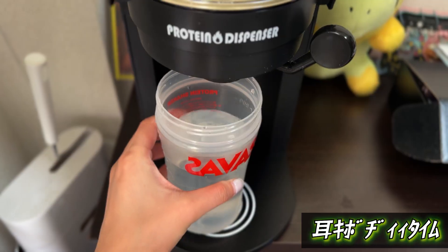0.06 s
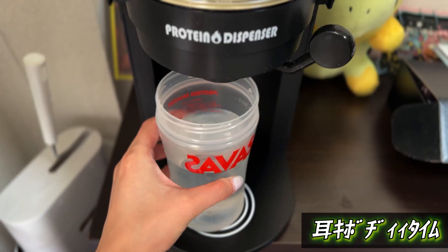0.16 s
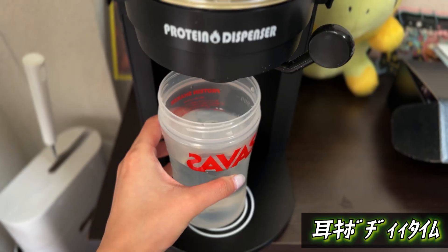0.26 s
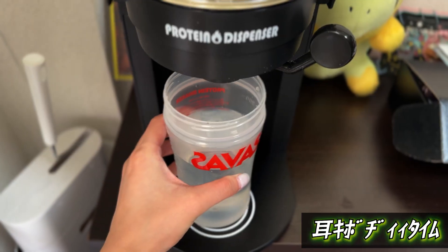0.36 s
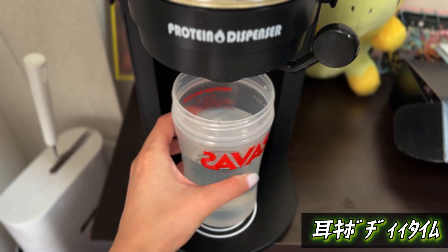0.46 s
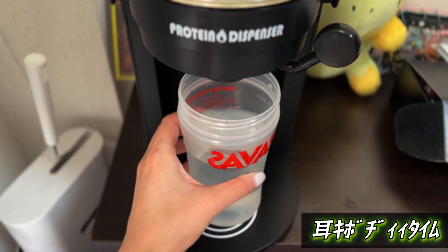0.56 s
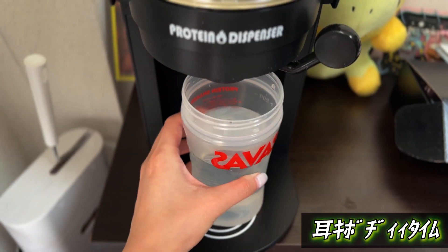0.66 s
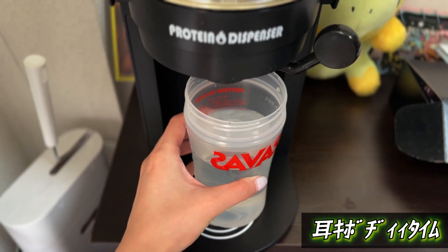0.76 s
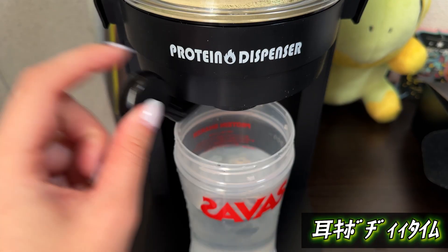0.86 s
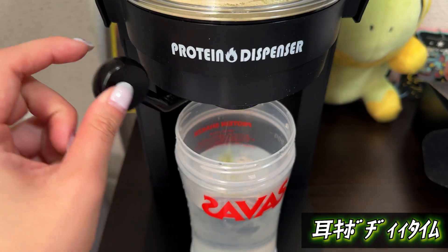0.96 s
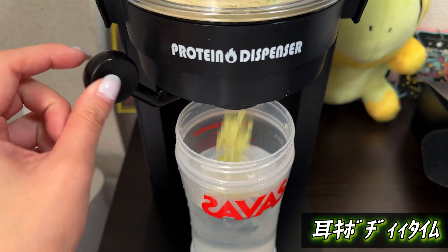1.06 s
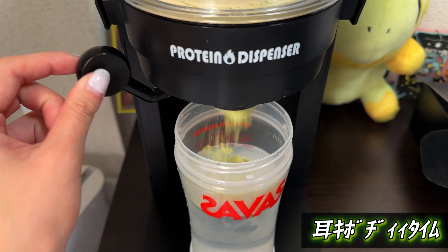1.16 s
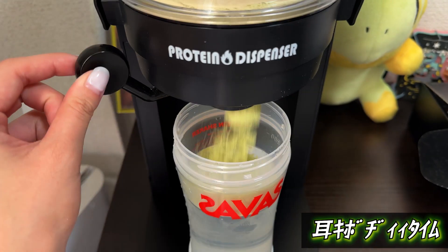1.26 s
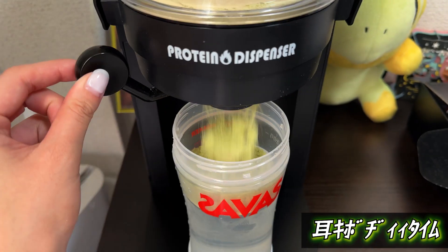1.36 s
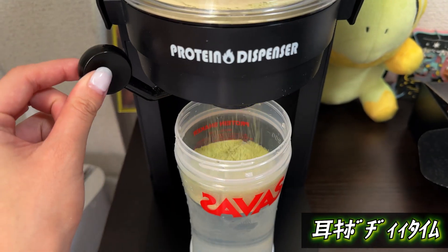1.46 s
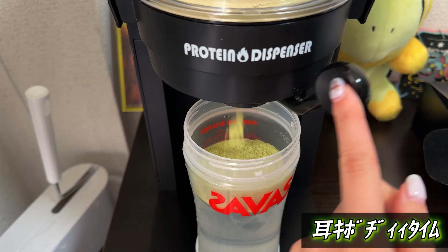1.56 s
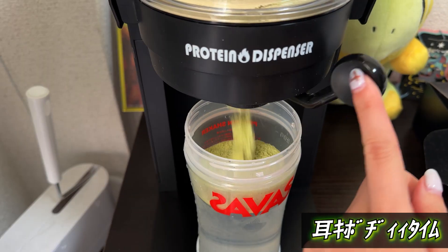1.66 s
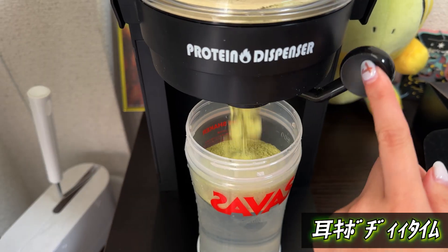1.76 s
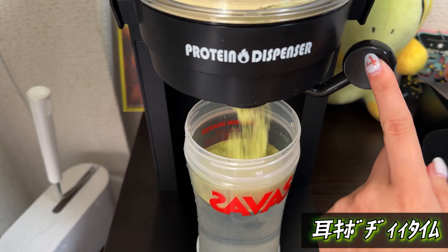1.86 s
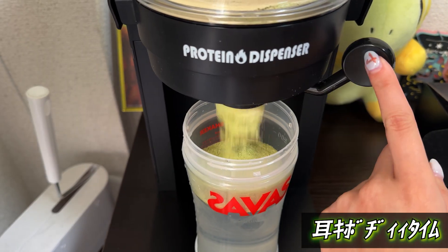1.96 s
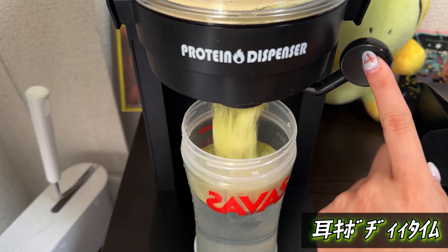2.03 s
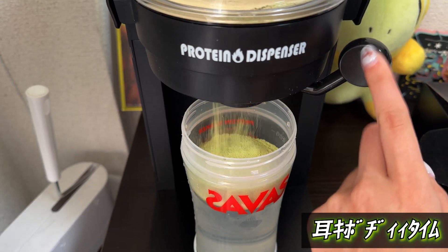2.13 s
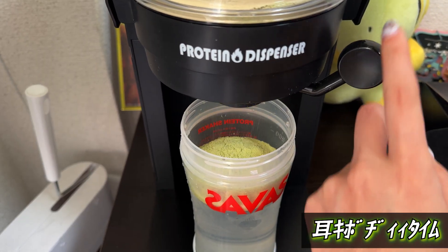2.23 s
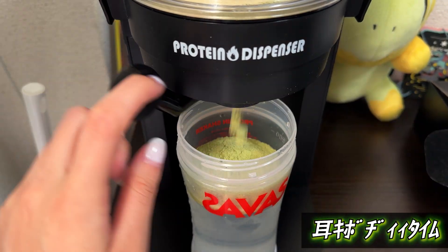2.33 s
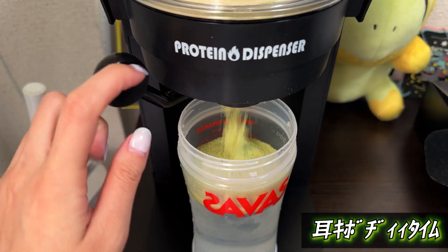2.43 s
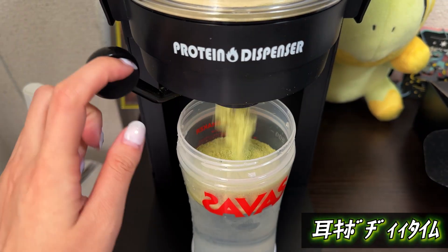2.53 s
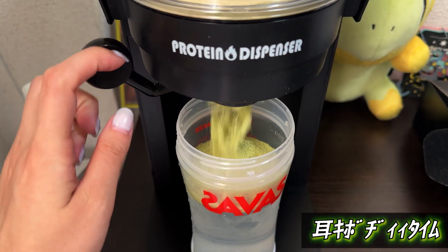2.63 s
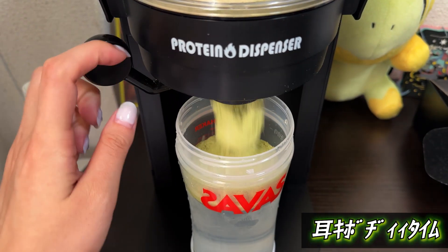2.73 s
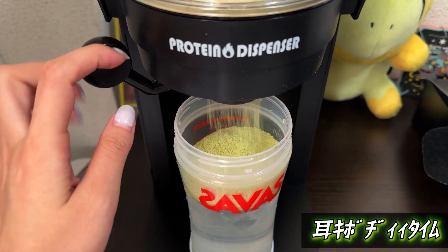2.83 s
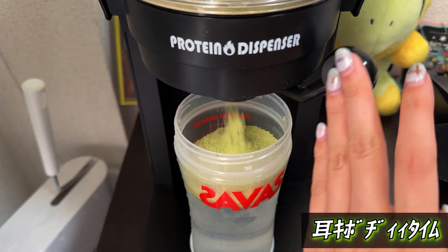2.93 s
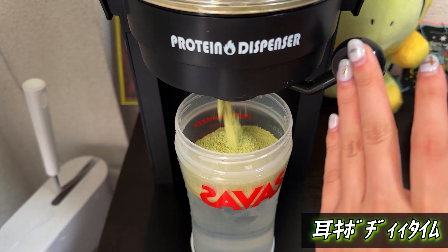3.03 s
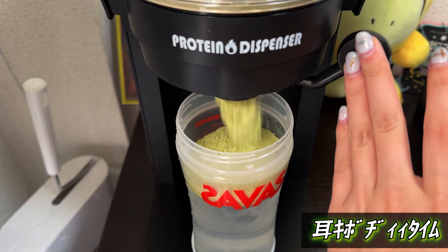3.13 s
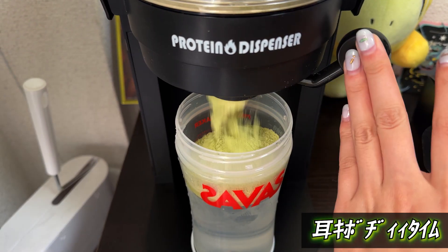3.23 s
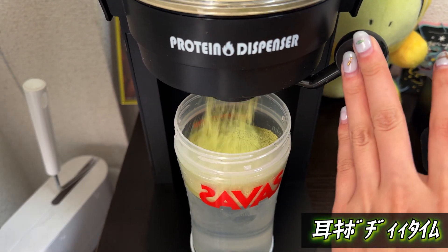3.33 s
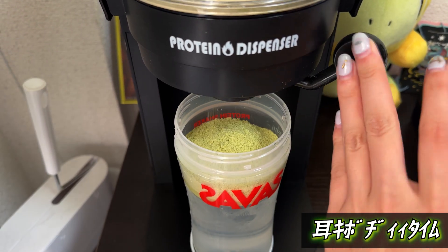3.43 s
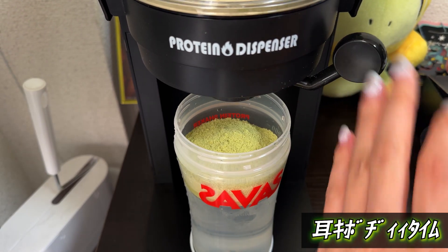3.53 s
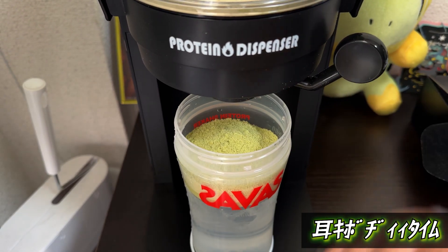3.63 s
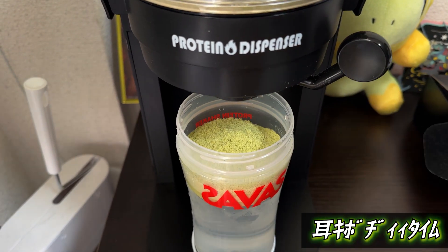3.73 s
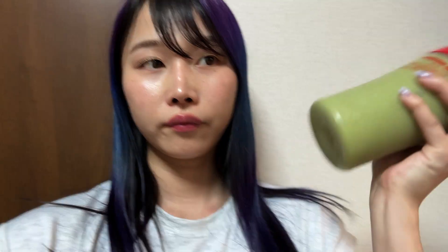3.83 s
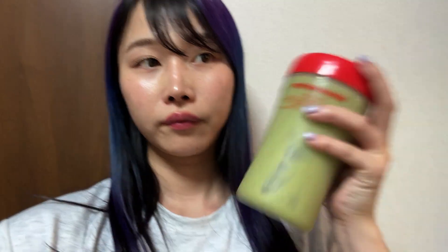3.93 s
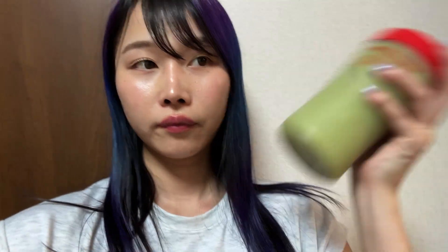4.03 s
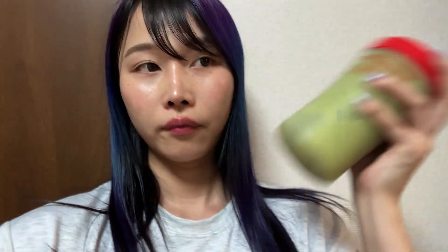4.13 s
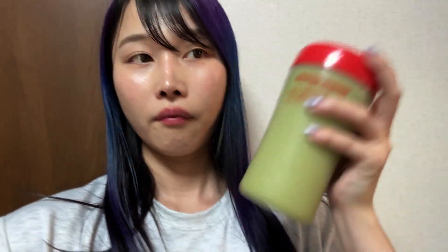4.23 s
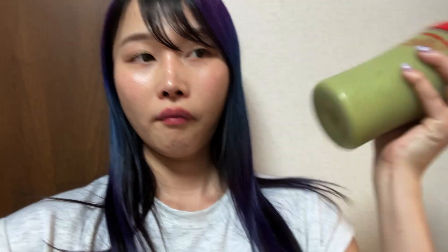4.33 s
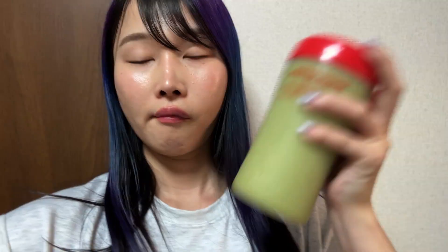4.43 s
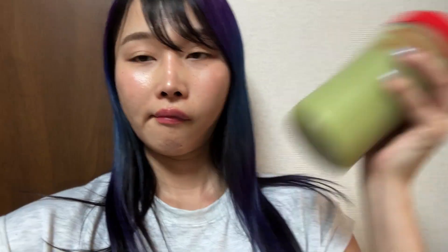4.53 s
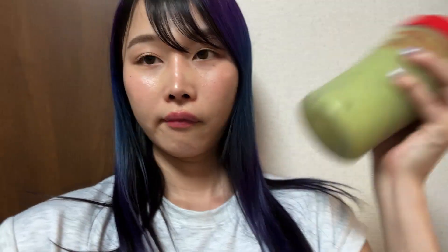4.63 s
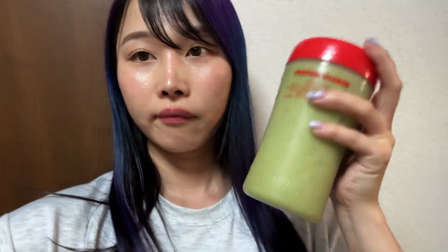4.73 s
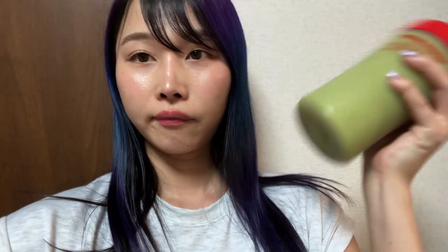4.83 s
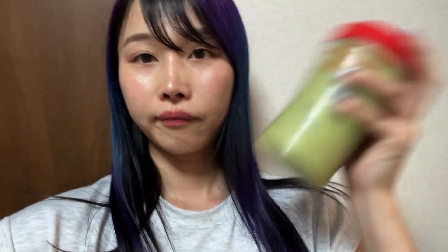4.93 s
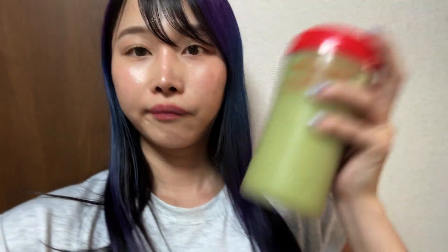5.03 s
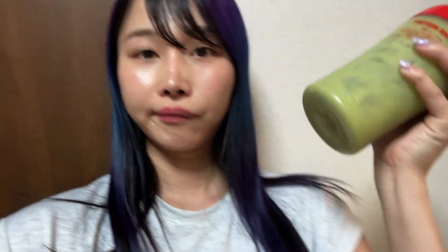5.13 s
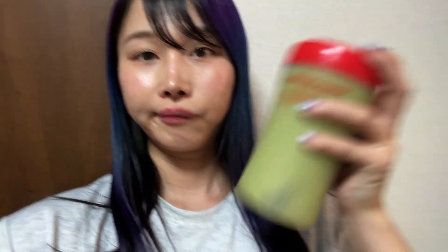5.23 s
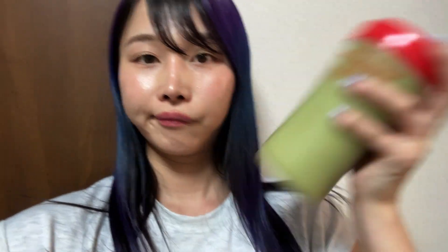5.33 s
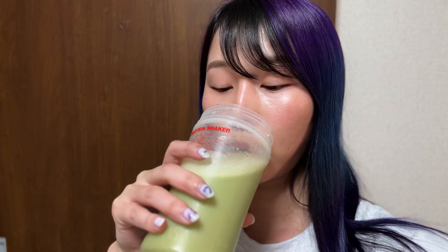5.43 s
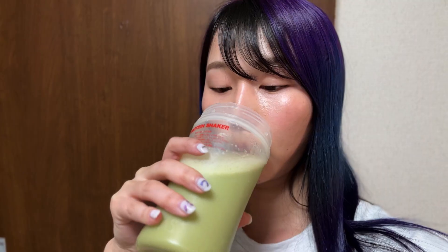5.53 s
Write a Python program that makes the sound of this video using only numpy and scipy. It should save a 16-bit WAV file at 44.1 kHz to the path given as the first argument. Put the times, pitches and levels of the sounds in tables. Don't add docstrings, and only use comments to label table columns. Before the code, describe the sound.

Recorded close in stereo in a small home kitchen, over low appliance hum, soft hiss and faint high insect clicks. At about 0.17 s a water-filled plastic bottle thumps onto a tray, bounces quickly and settles by 0.3 s, then is faintly rocked. From 0.85 s a plastic dispenser lever scrapes through dry powder, jamming into a hollow clack at 1.2 s. Three more gritty strokes follow at 1.6, 2.3 and 2.9 s, clacking at 1.95, 2.64 and 3.18 s, with rattles, barely audible dust trickles, tiny nail ticks and finger brushes; a soft deep thud comes at 3.5 s. At 3.82 s a hard cut brings far louder shaking: roughly seven or eight watery slams per second, gulps, bubbling, droplets and foamy fizz inside a closed bottle. It stops abruptly at 5.42 s, leaving low hum and a soft rustle from the tilted open bottle.

```python
import sys
import numpy as np
from scipy import signal
from scipy.fft import rfft, irfft, next_fast_len
from scipy.io import wavfile
from scipy.ndimage import uniform_filter1d, map_coordinates

SR = 44100
rng = np.random.default_rng(int(sys.argv[2]) if len(sys.argv) > 2 else 0)


def unload_audio(sound):
    columns = np.transpose(np.atleast_2d(sound))
    steps = np.round(np.clip(columns, -1, 1) * 32767)
    wavfile.write(sys.argv[1], SR, steps.astype(np.int16))


def boost(x):
    u = np.asarray(x, float) / 20
    return 10 ** u


N = 246078
T = np.arange(N) / SR

CUTS = [
    0,
    .8491,
    1.6166,
    2.3173,
    2.917,
    3.8186,
    5.4212,
]


# start_s, hold_s, surge_db, foam_db
SLOSH = [(3.816, 0.052, -37, -41.5), (3.952, 0.033, -30, -39), (4.054, 0.061, -45.5, -42.5),
         (4.184, 0.065, -38, -42), (4.322, 0.057, -35.5, -40.5), (4.476, 0.038, -34.5, -40.5),
         (4.599, 0.059, -34.5, -42), (4.748, 0.052, -31, -42), (4.893, 0.0052, -41, -44.5),
         (4.949, 0.0054, -44, -48.5), (5.026, 0.033, -35.5, -41), (5.153, 0.036, -34, -42.5),
         (5.285, 0.024, -31, -41.5), (5.363, 0.066, -61, -46)]


def slosh():
    s, hold, surge_db, foam_db = np.transpose(SLOSH)
    on = (T >= CUTS[5]) & (T < CUTS[6])
    surge = on * swell(s, hold, surge_db, rise=889, fall=335)
    foam = on * swell(s, hold, foam_db, rise=606, fall=205)
    spray = on * swell(s, hold, foam_db - 23, rise=350, fall=139)
    return surge, foam, spray


# start_s, peak_db, air_pocket_hz, slap_db
SLAMS = [(3.823, -25, 556, -31), (3.951, -24.5, 294, -12), (4.029, -34, 686, -17), (4.107, -32.5, 344, -18),
         (4.19, -45.5, 775, -12), (4.223, -12.5, 245, -14), (4.327, -36, 473, -41), (4.482, -27.5, 686, -4),
         (4.597, -29, 315, -46), (4.743, -11.5, 276, -29), (4.771, -20.5, 593, -37),
         (4.883, -30.5, 622, -5), (5.019, -19.5, 300, -3.5), (5.047, -23, 590, -21), (5.139, -39, 553, -30),
         (5.263, -41, 401, -12), (5.288, -25, 671, -1), (5.356, -19, 611, -16.5), (5.401, -27, 524, -15)]
# start_s, peak_db, start_pitch_hz
GULPS = [
    (4.03, -36, 703),
    (4.375, -37.5, 400),
    (4.892, -38.5, 420.4),
    (5.05, -36.5, 668),
    (5.14, -34, 601),
    (5.358, -38, 690),
]
# start_s, peak_db, pitch_hz
SPITS = [(3.8282, -31, 3180), (3.956, -44, 3500), (4.1067, -22, 4370), (4.1811, -33.5, 2900),
         (4.221, -44, 3300), (4.256, -29, 3780), (4.3244, -28, 2980), (4.3611, -19, 3760),
         (4.4808, -31, 4200), (4.606, -28, 3320), (4.6895, -24.5, 4300), (4.7846, -16.5, 4640),
         (4.8863, -18, 3050), (4.9573, -25.5, 3780), (5.017, -30, 4000), (5.1152, -38.5, 2270),
         (5.1541, -27.5, 3600), (5.2268, -23, 3800), (5.2817, -27, 2030), (5.297, -21.5, 5000),
         (5.3899, -28, 3590)]
# pitch_hz, width_hz, level_db
BOTTLE = [(111, 95, -14), (330, 143, -1.5), (637, 230, -4.5), (856, 72, -3)]
# pitch_hz, level_db (per Hz)
FIZZ = [(590, 0.5), (1000, 2.5), (1550, -3.5), (1790, -4.5), (2220, 4), (2560, -3), (4540, -3.5),
        (5730, -6), (6730, -7), (8500, -19.5), (11000, -24), (18700, -120)]
# pitch_hz, level_db (per Hz)
SPRAY = [(4410, -42), (7500, -3.5), (8490, -27), (9730, -25), (11500, -8.5), (14000, 0.5), (15200, -8.5),
         (16000, -13)]


def shaking(surge, fizz, spray):
    lumps = wobble(45)
    churn = 0.85 * patchy(resonant(grainy(120, depth_db=3.0), BOTTLE), depth_db=2.0)
    churn += 0.5 * bubbles(count=420, low_hz=482, spread=4.42, cycles=2.0, glide=24)
    x = surge * boost(1.3 * lumps + 0.7 * wobble(28) - 9.5) * churn
    foam = 0.92 * patchy(coloured(grainy(300, depth_db=4.5), FIZZ), depth_db=4.5)
    foam += 0.14 * bubbles(count=1100, low_hz=1498, spread=3.6, cycles=9.2, glide=33.0)
    x += fizz * boost(1.03 * lumps - 2.0) * foam
    mist = coloured(grainy(200, depth_db=3.5), SPRAY)
    x += spray * mist * boost(2.3 * lumps + 0.95 * wobble(11) - 0.5)
    t = T[:SR // 8]
    for s, db, hz, slap_db in SLAMS:
        t60 = 0.059 * np.exp(-0.1 * (db + 23.0))
        settle = 1 + 0.0011 * (1 - np.exp(-t / 0.0025)) / (t + 1e-4)
        overtone = ring(hz * (1.507 + rng.random()), 1.35 * t60, 0.00074, t)
        pocket = ring(hz * settle, t60, 0.0023, t) + 0.24 * overtone
        slap = boost(slap_db - 9.0) * burst(0.033, 0.69, t)
        add(x, s, boost(db - 5.0) * (pocket + slap))
    for s, db, hz in GULPS:
        sinking_hz = hz * (1 - 2 * t)
        add(x, s, boost(db) * ring(sinking_hz, 0.18, 0.0036, t))
    for s, db, hz in SPITS:
        drop = 0.8 * ring(hz, 0.006, 0.0003, t) + 0.2 * burst(0.008, 0.9, t)
        add(x, s, boost(db - 4) * drop)
    return x * (T < CUTS[6])


# start_s, peak_db, pitch_hz
BLOBS = [(3.82, -19.5, 574), (3.854, -39, 689), (3.93, -13, 1100), (3.951, -13.5, 630), (4.03, -31, 680),
         (4.052, -33, 568), (4.107, -40, 840), (4.182, -35, 980), (4.222, -25, 670), (4.252, -16.5, 514),
         (4.326, -38, 482), (4.466, -19, 604), (4.485, -13.5, 660), (4.594, -29, 584), (4.608, -15, 850),
         (4.743, -29, 403), (4.772, -11, 620), (4.884, -32, 641), (5.005, -25, 1110), (5.017, -22, 525),
         (5.048, -32, 630), (5.117, -25, 670), (5.136, -19, 594), (5.162, -14, 527), (5.229, -33, 540),
         (5.263, -24, 700), (5.29, -14, 710), (5.317, -22, 426), (5.354, -25, 659), (5.401, -22, 520),
         (3.875, -27, 800), (3.956, -5, 1190), (3.968, -23, 263), (3.985, -20, 695), (4.09, -32.5, 231),
         (4.198, -19, 900), (4.36, -30, 308), (4.398, -31, 342), (4.497, -12, 1550), (4.5, -21, 325),
         (4.52, -23, 670), (4.562, -25, 587), (4.614, -23, 298), (4.632, -14, 816), (4.648, -33, 403),
         (4.667, -26, 240), (4.787, -14.5, 517), (4.808, -28, 257), (4.903, -19, 344), (4.917, -28, 340),
         (5.047, -22, 1900), (5.068, -14, 1340), (5.172, -34, 800), (5.19, -27, 555), (5.307, -35, 355),
         (5.32, -18, 490), (5.357, -29, 1130), (5.366, -18, 636), (5.404, -17.5, 1020), (5.415, -25, 386)]


def blobs():
    x, t = np.zeros(N), T[:SR // 20]
    for s, db, hz in BLOBS:
        rising_hz = hz * (1 + 6.6 * t)
        add(x, s, boost(db - 4) * ring(rising_hz, 6.3 / hz, 0.0014, t))
    return x


# start_s, level_db, start_pitch_hz
SPLASHES = [
    (3.937, -34, 2183),
    (4.182, -34, 1961),
    (4.465, -39, 1958),
    (4.736, -44, 1468),
    (4.883, -37, 1349),
    (5.006, -39.5, 1767),
    (5.281, -39.5, 2110),
]


def splashes():
    x, t = np.zeros(N), T[:SR // 20]
    for s, db, hz in SPLASHES:
        turns = hz * (0.22 * t + 0.7 * 0.022 * (1 - np.exp(-t / 0.018)))
        rough = uniform_filter1d(rng.standard_normal((3, len(t))), size=40, axis=1)
        tones = unit(np.sum(rough * np.sin(2 * np.pi * turns * [[0.8], [1], [1.3]]), axis=0))
        add(x, s, boost(db) * tones * np.exp(-t / 0.02) * (1 - np.exp(-t / 0.00086)))
    return x


# start_s, stop_s, body_db, grit_db, jam_db
STROKES = [
    (.85, 1.215, -51.5, -54, -34.5),
    (1.615, 1.946, -51.5, -58.5, -45),
    (2.317, 2.637, -52.5, -55, -43),
    (2.918, 3.183, -52.5, -57, -40),
]
# start_s, level_db
CATCHES = [
    (.878, -54),
    (1.014, -48.5),
    (1.734, -51.5),
    (1.865, -50),
    (2.326, -46.5),
    (2.536, -64),
    (3.002, -50.5),
]


def travel():
    start, stop, body_db, grit_db, jam_db = np.transpose(STROKES)
    moving = sum((T >= a) & (T < b) for a, b in zip(start, stop))
    s, db = np.transpose(CATCHES)
    catch = swell(s, 0, db, rise=520, fall=430)
    jam = swell(stop, 0, jam_db, rise=699, fall=699)

    def ease(levels, sag):
        return sum(boost(g - sag * (T - a)) * (T >= a) * (T < b) for a, b, g in zip(start, stop, levels))

    body = np.maximum(ease(body_db, 19.5), moving * np.maximum(catch, jam))
    grit = np.maximum(ease(grit_db, 23), moving * catch * boost(-4.0))
    return body, grit


# start_s, hold_s, housing_db, skin_db (skin rustle relative to housing)
TOUCHES = [
    (2.168, 0.027, -49.5, -13.5),
    (3.438, 0.0029, -58, -17),
    (3.462, 0.0036, -50.5, -15.5),
]
# pitch_hz, width_hz, level_db
HOUSING = [(330.5, 177, 5.5), (768, 690, -2), (1023, 49, 8), (1399, 46, -0.5)]
# pitch_hz, level_db (per Hz)
GRIT = [(880, -18), (1500, -3), (1850, -6), (2830, -0.5), (3550, -5.5), (3960, -4), (4690, -6.5),
        (5440, -10.5), (7840, -6), (9250, -5.5), (9750, 0.5), (10300, -12.5), (15700, -11.5),
        (16200, -22.5)]


def lever(low, high):
    body = resonant(grainy(90, depth_db=1.5), HOUSING)
    grit = coloured(grainy(400, depth_db=2.5), GRIT) * boost(1.6 * wobble(35) + 0.9 * wobble(110) - 1.8)
    skin_colour = [(900, -25), (1600, -8), (2350, 0), (3500, -7), (9000, -16), (14000, -36)]  # Hz, dB per Hz
    skin = coloured(grainy(150, depth_db=2.5), skin_colour)
    s, hold, db, skin_db = np.transpose(TOUCHES)
    touched = resonant(body, [(497, 300, 17.0), (2020, 3800, -21.0)])
    x = low * body + high * grit
    x += swell(s, hold, db, rise=860, fall=590) * touched
    return x + swell(s, hold, db + skin_db, rise=480, fall=1300) * skin


# start_s, peak_db, upper_modes_db, crack_db, lower_modes_db
CLACKS = [
    (1.2, -25, -0.5, -40.5, 2),
    (1.946, -31.5, -7, -23.5, 5),
    (2.181, -44.5, 5, -21, 0),
    (2.204, -55.5, 9, -40, -5),
    (2.641, -23.5, 1.5, -19.5, 5),
    (3.178, -28, -1.5, -29.5, 5),
]
# pitch_hz, level_db, ring_s (time to fall 60 dB)
STOP = [(258, -13, 0.095), (334, -11.5, 0.11), (455.7, 3.5, 0.048), (550, -7, 0.14), (690, 8, 0.036),
        (945, 1.5, 0.031), (1115, -9, 0.025), (1380, -1, .018), (1820, -13.5, 0.022), (2294, -7.5, 0.01),
        (2900, -13, 0.013), (4000, -21, 0.0069)]
# delay_s (after the clack), level_db, pitch_hz
ECHOES = [
    (.014, -7.5, 679),
    (.034, -19.5, 560),
    (.058, -20, 540),
]
# start_s, peak_db, pitch_hz
THUDS = [
    (0.957, -44, 204),
    (3.517, -39, 102.3),
]
# start_s, peak_db, pitch_hz, knock_db
TICKS = [(0.371, -62, 6370, -8), (0.4664, -60.5, 4520, 4), (1.009, -36, 9100, -8), (1.0444, -61, 9680, -7),
         (1.2088, -37.5, 3320, -14), (1.933, -34, 4000, -25), (2.108, -56, 6400, -21),
         (2.1281, -54, 9760, -21), (2.161, -45.5, 10400, -7), (2.811, -36.5, 10400, -11.5),
         (2.93, -53.5, 4000, -18), (3.2128, -56, 8940, -23.5), (3.2356, -56.5, 9460, -25),
         (3.273, -58.5, 7590, -20), (3.3469, -69, 4730, -17), (3.418, -55.5, 9680, -28)]


def knocks():
    x, t = np.zeros(N), T[:SR // 5]
    for s, db, upper_db, crack_db, lower_db in CLACKS:
        modes = 0
        for hz, g, t60 in STOP:
            level_change, pitch_change = 0.6 * rng.standard_normal(2)
            mode_db = g + level_change + upper_db * (hz > 800) + lower_db * (hz < 600)
            late = 0.00271 * min(690 / hz, 1.15) ** 1.044
            mode_hz = hz * (1 + 0.034 * pitch_change)
            modes = modes + boost(mode_db) * ring(mode_hz, t60, 1.26 / hz, np.maximum(t - late, 0))
        for after, g, hz in ECHOES:
            add(x, s + after, boost(db + 13.5 + g) * ring(hz, 0.025, 0.0037, t))
        hand = 0.4 + np.exp(-(t / 0.011) ** 2)
        loose_parts = uniform_filter1d(burst(0.08, 0.8, t), size=5)
        rattle = boost(-9) * loose_parts * (1 - np.exp(-t / 0.003))
        crack = burst(0.0079, 0.41, t) + 0.83 * ring(9500, 0.016, 0.00034, t)
        add(x, s, boost(db) * (modes * hand + rattle + boost(crack_db + 11.0) * crack))
    for s, db, hz in THUDS:
        add(x, s, boost(db) * ring(hz, 0.095, 0.014, t))
    for s, db, hz, knock_db in TICKS:
        snap = 0.5 * burst(0.024, 0.025, t) + 0.75 * ring(hz * (1 - 8 * t), 0.012, 0.00052, t)
        knock = ring(1000, 0.052, 0.00034, t) + 0.51 * ring(1800, 0.027, 0.0023, t)
        add(x, s, boost(db - 0.5) * (snap + boost(knock_db) * knock))
    return x


# start_s, hold_s, level_db
CRUMBS = [(0.903, 0.016, -59), (1.03, 0.0051, -68.5), (1.703, 0.017, -61.5), (1.829, 0.0074, -57.5),
          (1.87, .02, -67.5), (1.9, 0.0066, -56.5), (2.413, .006, -51.5), (2.433, .004, -58.5),
          (2.99, 0.0074, -64.5), (3.114, 0.011, -53.5), (3.143, 0.009, -53), (3.171, 0.0072, -51)]
# start_s, hold_s, level_db
FALLING = [
    (1.235, 0.092, -75.5),
    (1.977, 0.041, -67.5),
    (2.135, 0.038, -69),
    (2.68, 0.048, -75),
    (2.83, 0.055, -78),
    (3.202, .03, -94),
    (3.251, 0.027, -71),
    (3.417, 0.011, -74),
    (3.444, 0.019, -72.5),
]
# pitch_hz, level_db (per Hz)
DUST = [(2940, -41), (5000, -12.5), (6830, -5), (10100, 0.5), (11000, -16.5), (13400, -4.5), (16000, -4)]
# start_s, hold_s, level_db
SIP = [
    (5.432, .05, -69.5),
    (5.494, 0.061, -61),
]
# pitch_hz, level_db (per Hz)
LIP = [(240, -4), (400, -4.5), (774, -16), (947, -7), (1330, -27), (2430, -17.5), (2980, -33), (6330, -28),
       (10000, -44), (13000, -82), (22000, -120)]
# a table of pitch_hz, left_lead_radians, then one of pitch_hz, left_minus_right_db
LEVER_PORTS = [(0, 0), (1300, 0), (2330, -5.7), (2760, -3.2), (3880, -1.0), (7500, 8.9), (10700, 6.4),
               (16100, 4)], [(60, 2.5), (200, 3.0), (380, 1.5), (700, 4.5), (1290, 3.0), (2380, -1.5),
               (8120, 2.0), (15000, 0.0)]


def powder():
    bite = swell(*np.transpose(CRUMBS), rise=990, fall=3900) * coloured(grainy(500, depth_db=2), GRIT)
    dust = swell(*np.transpose(FALLING), rise=500, fall=330) * boost(2.1 * wobble(60))
    direct_dust = 0.49 * dust * coloured(grainy(600, depth_db=5.0), DUST)
    tilt = swell(*np.transpose(SIP), rise=730, fall=300) * (T > CUTS[6]) * diffuse(LIP)
    return ports(bite + direct_dust, LEVER_PORTS) + 0.47 * dust * diffuse(DUST) + tilt


# start_s, peak_db, cup_db, crack_db
SETDOWN = [
    (0.1665, -34.5, 20, 9.5),
    (.174, -14, -6, -26),
    (0.194, -22, -1, -28),
    (0.209, -21, -7, -40),
    (0.3, -35.5, 2.5, -40),
    (.311, -30, -7, -34),
]
# pitch_hz, level_db, ring_s (time to fall 60 dB)
TRAY = [(189, -1.5, 0.2), (215.5, -4.5, 0.1), (147, -5.5, .03), (323.5, -11, 0.14), (486, -10, 0.041)]
# pitch_hz, level_db, ring_s
CUP = [(1000, -2.5, 0.031), (1010, -3, 0.027), (1493, -9, 0.019), (2410, 8.5, 0.012), (4300, -5, .01),
       (6400, 2.5, .01)]
# start_s, hold_s, level_db
ROCKING = [
    (0.365, .01, -71),
    (0.46, 0.1, -72.5),
    (0.749, 0.019, -74),
]


def bottle_on_tray():
    x, t = np.zeros(N), T[:SR // 3]
    tray = sum(boost(g) * ring(hz, t60, 0.0019, t) for hz, g, t60 in TRAY)
    for s, db, cup_db, crack_db in SETDOWN:
        hardness_db = crack_db - cup_db
        cup = sum(boost(g + hardness_db * (hz > 2000)) * ring(hz, t60, 0.0024, t) for hz, g, t60 in CUP)
        crack = boost(crack_db) * burst(0.02, 0.9, t)
        add(x, s, boost(db - 2.5) * (tray + boost(cup_db) * cup + crack))
    wall = [(1020, 180, 0)]
    rub = resonant(resonant(grainy(38.6, depth_db=-2.5), wall), wall)
    return x + swell(*np.transpose(ROCKING), rise=1100, fall=160) * rub


def scattered(grit, foam):
    return boost(1.5) * grit * diffuse(GRIT) + boost(-3.5) * foam * diffuse(FIZZ)


# pitch_hz, ring_s (time to fall 60 dB)
KITCHEN = [(150, 0.38), (700, 0.3), (3000, 0.3), (10000, 0.4)]
# pitch_hz, level_db
WALLS = [(150, 0.5), (800, 2.5), (3000, 6), (8000, -5), (14000, -7.5)]


def kitchen(x):
    wet, edges = np.zeros((2, N)), [round(s * SR) for s in CUTS] + [N]
    for a, b in zip(edges, edges[1:]):
        hz, t, z = signal.stft(rng.standard_normal((2, SR // 2)), SR, nperseg=256)
        fade_db = -60 * t / along(KITCHEN, hz)[:, None]
        tail = signal.istft(z * boost(fade_db + along(WALLS, hz)[:, None]), SR, nperseg=256)[1]
        tail = np.pad(tail, ((0, 0), (150, 0))) / np.linalg.norm(tail[0])
        wet[:, a:b] = signal.fftconvolve(x[None, a:b], tail, axes=1)[:, :b - a]
    return wet


# pitch_hz, level_db (per Hz)
AIR = [(180, -44.5), (300, -6.5), (366, 3), (467, -12.5), (942, -17.5), (1870, -17), (2210, -22),
       (3140, -11.5), (3610, -17.5), (4750, -14.5), (6640, -15.5), (10500, -30), (11500, -47.5),
       (15000, -74), (22000, -120)]
HISS = [-73, -75, -72, -71, -73.5, -92, -100]
# pitch_hz, level_db (per Hz)
DRONE = [(15, -44.5), (25, -9), (81, 2), (118, -6.5), (155, -9.5), (199, -11.5), (237, -7), (251, -11),
         (400, -56.5), (520, -88.5), (880, -120)]
HUM = [-62, -62.5, -60.5, -60, -64.5, -66.5, -62.5]
# start_s, clicks (count)
INSECT = [
    (1.2434, 11),
    (1.9769, 2),
    (2.7057, 2),
    (3.2041, 3),
    (3.3712, 2),
    (3.4824, 4),
    (3.6411, 5),
]


def background():
    air = diffuse(AIR) * per_shot(HISS) * boost([[1.5], [-1.5]])
    throb = boost(0.37 * wobble(2.0) + 1.5 * wobble(8.2))
    drone = diffuse(DRONE) * per_shot(HUM) * throb * boost([[1.5], [0.6]])
    pulses, t = np.zeros(N), T[:SR // 50]
    pair = np.exp(-((t - 0.002) / 0.0014) ** 2) + 0.8 * np.exp(-((t - 0.009) / 0.0014) ** 2)
    for s, clicks in INSECT:
        for k in range(clicks):
            start = s + k * 0.0333 + rng.normal(0, 0.0015)
            add(pulses, start, boost(-70.5 + rng.normal(0, 1.5)) * pair)
    wings = resonant(rng.standard_normal((2, N)), [(6000, 1000, 4.0), (7640, 500, -1.0)])
    insect = (wings[0] + 0.49 * np.array([wings[1], -wings[1]])) * pulses
    chorus = boost(-87) * resonant(rng.standard_normal((2, N)), [(4620, 90, 0)])
    return air + drone + insect + chorus


def unit(x):
    return x / np.sqrt(np.mean(x ** 2) + 1e-20)


def along(points, hz):
    f, v = np.transpose(points)
    return np.interp(np.log(hz + 1), np.log(f + 1), v)


def wobble(rate):
    coarse = T[::16]
    knots = rng.standard_normal(int(N * rate / SR) + 4)
    return unit(np.interp(T, coarse, map_coordinates(knots, [coarse * rate])))


def filtered(x, response):
    m = next_fast_len(N + 8192)
    return irfft(rfft(x, m) * response(np.fft.rfftfreq(m, 1 / SR)), m)[..., :N]


def coloured(x, spectrum):
    return unit(filtered(x, lambda f: boost(along(spectrum, f))))


def resonant(x, peaks):
    def response(f):
        total = 0
        for k, (c, w, db) in enumerate(peaks):
            total = total + (-1) ** k * boost(db) * 1j * f * w / (c * c - f * f + 1j * f * w)
        return total
    return unit(filtered(x, response))


def grainy(rate, depth_db):
    return unit(rng.standard_normal(N) * boost(depth_db * wobble(rate)))


def patchy(x, depth_db):
    z = signal.stft(x, nperseg=256)[2]
    field = uniform_filter1d(rng.standard_normal(z.shape), size=4, axis=0)
    field = uniform_filter1d(field, size=9, axis=1)
    return unit(signal.istft(z * boost(depth_db * unit(field)), nperseg=256)[1][:N])


def bubbles(count, low_hz, spread, cycles, glide):
    r, t = rng.random((count, 4)), T[:700]
    place, pitch, strength, bend = r[:, :1], r[:, 1:2], r[:, 2:3], r[:, 3:]
    hz = low_hz * spread ** pitch
    phase = 2 * np.pi * hz * t * (1 + glide * (2 * bend - 0.7) * t)
    envelope = np.exp(-t * hz / cycles) * (1 - np.exp(-t * hz / 0.75))
    blips = boost(-2.6 * np.log(strength + 0.065)) * np.sin(phase) * envelope
    length = CUTS[6] - CUTS[5]
    at = ((CUTS[5] + place * length) * SR).astype(int) + np.arange(len(t))
    fade = np.hanning(2 * len(t))[len(t):]
    return np.bincount(at.ravel(), (blips * fade).ravel(), N)[:N] / np.sqrt(np.sum(blips ** 2) / length / SR)


def ring(hz, t60, attack, t):
    return np.sin(2 * np.pi * hz * t) * boost(-60 * t / t60) * (1 - np.exp(-t / attack))


def burst(t60, tilt, t):
    poles = np.convolve([1, -0.93], [1, -np.clip(tilt, 0, 0.95)])
    return unit(signal.lfilter([1, -1], poles, rng.standard_normal(len(t)))) * boost(-60 * t / t60)


def add(x, s, y):
    x[round(s * SR):][:len(y)] += y[:N - round(s * SR)]


def swell(s, hold, db, rise, fall):
    s, hold, db = (np.reshape(v, (-1, 1)) for v in (s, hold, db))
    before, after = np.maximum(s - T, 0), np.maximum(T - s - np.abs(hold), 0)
    return boost((db - rise * before - fall * after).max(axis=0))


def per_shot(db):
    return boost(np.array(db)[np.searchsorted(CUTS, T, side="right") - 1])


def ports(x, table):
    def response(f):
        lead = along(table[0], f)
        turn = np.exp(0.5j * lead) * boost(along(table[1], f) / 2)
        lift = np.sqrt(1.3 / (np.cos(lead / 2) ** 2 + 0.45))
        return np.array([turn, 1 / turn]) * lift
    return filtered(x, response)


# pitch_hz, likeness (0 to 1)
AIR_ALIKE = [(60, 0.87), (180, 0.87), (550, 0.31), (1650, 0.03), (4970, 0.02), (15000, 0.011)]


def diffuse(spectrum):
    def response(f):
        turn = np.arccos(np.clip(along(AIR_ALIKE, f), -1, 1)) / 2
        return boost(along(spectrum, f)) * [np.cos(turn), np.sin(turn)]
    mid, side = filtered(rng.standard_normal((2, N)), response)
    return unit(np.array([mid + side, mid - side]))


# pitch_hz, left_lead_radians, then pitch_hz, left_minus_right_db
CUP_PORTS = [(0, 0), (1120, 0.4), (1380, 2.8), (2330, -5.6), (4600, 1.5), (5430, -4.4), (7580, 2.8),
             (16000, -2)], [(60, 0.5), (110, 0.5), (200, 2.0), (380, 0.0), (700, 4.0), (1290, 3.5),
             (2380, -2.5), (4400, 1.5)]
SHAKE_PORTS = [(0, 0), (860, -0.3), (1550, -1.2), (3270, -4.9), (6550, -11.1), (7060, -9.1), (9390, -8.7),
               (11800, -6.4)], [(60, -1.5), (200, -2.5), (380, -4.5), (700, -2.0), (2380, 0.5), (4400, 2.0),
               (8120, 5.5), (15000, 0.0)]
LEVER_SIDE = [0, 1.06, 0.46, 1.2, -0.87, 0, 0]


def scene():
    slide, liquid = travel(), slosh()
    shake = shaking(*liquid) + splashes() + blobs()
    machine = lever(*slide) + knocks()
    cup = bottle_on_tray()
    near = ports(cup, CUP_PORTS) + ports(shake, SHAKE_PORTS)
    near += ports(machine, LEVER_PORTS) * per_shot(LEVER_SIDE) ** [[1], [-1]]
    room = kitchen(boost(-13.5) * cup + boost(-16.5) * machine + boost(-10.5) * shake)
    return near + room + scattered(slide[1], liquid[1]) + background() + powder()


def top_cut(x):
    return signal.sosfilt(signal.butter(12, 16510, fs=SR, output="sos"), x)


def record(dry):
    def band(f):
        bass = 1j * f / 38
        return bass ** 2 / (1 + 1.4 * bass + bass ** 2) * (f < 15840)
    mix = filtered(dry, band)
    return top_cut(mix)


dry = scene()
out = record(dry)
unload_audio(out)
```